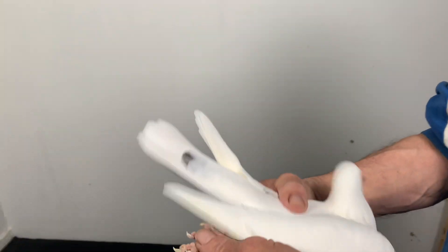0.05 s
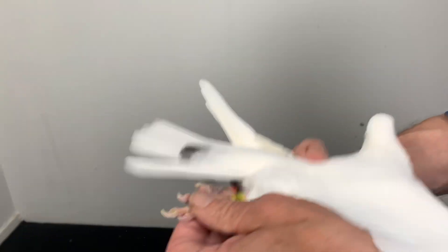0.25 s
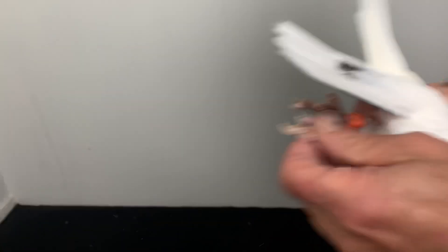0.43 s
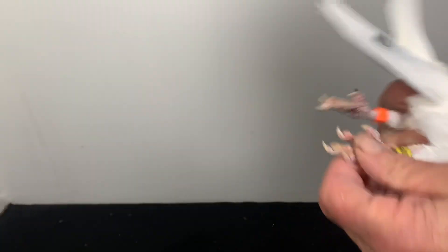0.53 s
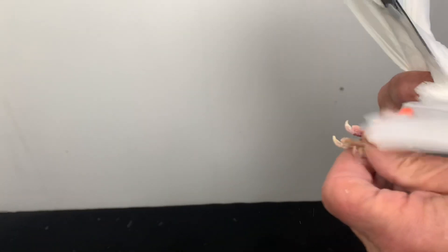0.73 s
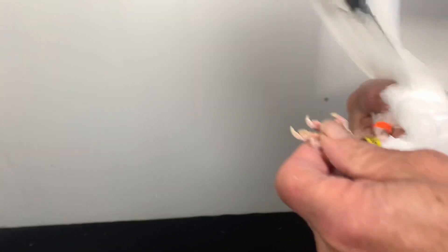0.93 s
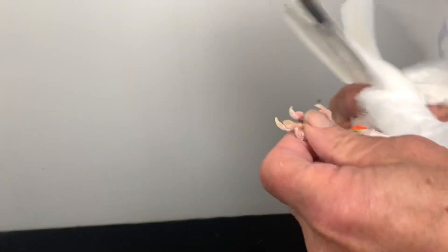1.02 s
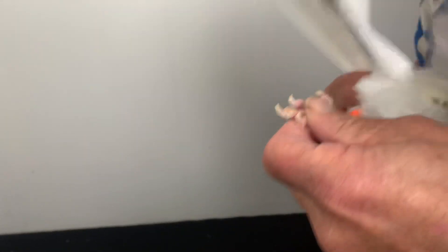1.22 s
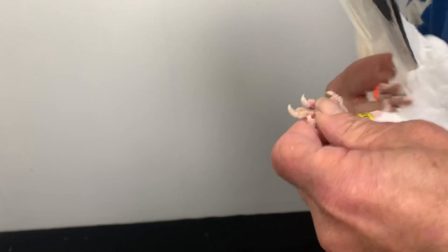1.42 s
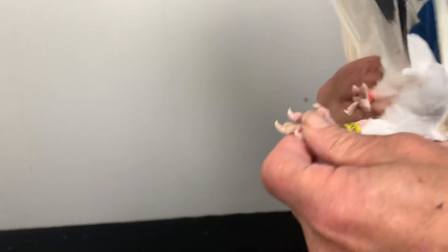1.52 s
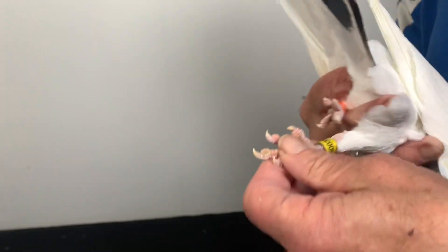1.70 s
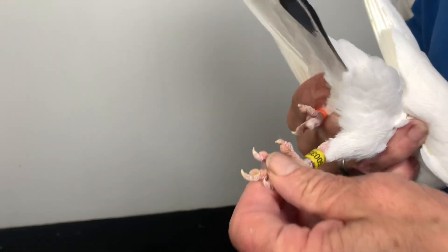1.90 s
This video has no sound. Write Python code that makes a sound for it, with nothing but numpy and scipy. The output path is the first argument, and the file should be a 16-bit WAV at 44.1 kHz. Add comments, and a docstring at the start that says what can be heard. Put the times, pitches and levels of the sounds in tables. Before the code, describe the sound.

A pigeon flaps its wings in short bursts, with rustling feathers, close up indoors.

```python
"""A pigeon held in the hands struggles close to a phone in a small bare room.
First its feathers slide over each other and over the fingers. At 0.2 s the wings clap and throw a puff
of air at the microphone, a thump that falls in pitch. Weak beats follow, then a second, louder clap
and puff at 1.1 s. Last, quills snap and the rustle fades. The walls answer each stroke briefly."""
import sys
import numpy as np
from scipy import signal
from scipy.fft import rfft, irfft, next_fast_len
from scipy.io import wavfile
from scipy.ndimage import uniform_filter1d, map_coordinates

SR = 44100
rng = np.random.default_rng(int(sys.argv[2]) if len(sys.argv) > 2 else 0)


def waveform_to_disk(signal):
    """Save audio, clipped to [-1, 1], as 16-bit WAV at the path in sys.argv[1]."""
    frames = np.transpose(np.atleast_2d(signal))
    scaled = np.clip(frames, -1, 1) * 32767
    samples = np.round(scaled).astype(np.int16)
    wavfile.write(sys.argv[1], SR, samples)


N = 85995


def undb(db):
    """Decibels to amplitude ratio."""
    return 10 ** (np.asarray(db) / 20)

def along(points, hz):
    """Interpolation of (Hz, value) rows on a log-frequency axis."""
    freqs, values = np.array(points, float).T
    return np.interp(np.log(np.maximum(hz, 1)), np.log(freqs), values)

def colour(x, spectrum, unit=True):
    """Minimum-phase filter from the folded cepstrum; with unit, white noise keeps its power."""
    size = next_fast_len(2 * N)
    gain = undb(along(spectrum, np.arange(size // 2 + 1) * SR / size))
    if unit:
        gain = gain / np.sqrt(np.mean(gain ** 2))
    cepstrum = irfft(np.log(gain), size)
    cepstrum[1:size // 2] *= 2
    cepstrum[size // 2 + 1:] = 0
    return irfft(rfft(x, size) * np.exp(rfft(cepstrum)), size)[..., :N]

def above(x, hz, order=2):
    """Zero-phase high-pass."""
    return signal.sosfiltfilt(signal.butter(order, hz, "high", fs=SR, output="sos"), x)

def since(start):
    """Seconds since a moment, zero before it."""
    return np.maximum(np.arange(N) / SR - start, 0)

def strike(start, attack, decay):
    """Transient envelope: quick rise to 1, exponential decay."""
    env = (1 - np.exp(-since(start) / attack)) * np.exp(-since(start) / decay)
    return env / env.max()

def swell(peak, rise, fall):
    """Exponential growth and decay joined by a rounded peak."""
    t = np.arange(N) / SR - peak
    return np.exp(.35 - np.hypot(.6, np.where(t < 0, t / rise, t / fall)))

IMPACT_SPREAD, RUSTLE_SPREAD = .45, 0.81  # side-to-mid amplitude ratios
def ports(draw, spread):
    """Partial coherence: two microphone ports share one noise and get another in antiphase."""
    return (draw() + spread * draw() * np.array([[1], [-1]])) / np.hypot(1, spread)

def hiss():
    """White Gaussian noise."""
    return rng.standard_normal(N)

# Each row: frequency in Hz, relative level of the background in dB.
BACKGROUND_SPECTRUM = [(25, -10), (55, -4), (110, -9), (200, -16.5), (400, -20.5), (1000, -33), (2200, -27),
                       (4000, -37), (9000, -36.5), (16000, -43)]
def background(level_db=-67.5):
    """Stationary noise: a faint, low rush throughout."""
    return undb(level_db) * colour(ports(hiss, RUSTLE_SPREAD), BACKGROUND_SPECTRUM)

# Each row: frequency in Hz, relative level of the churned air in dB.
CHURN_SPECTRUM = [(25, -17), (55, 5), (120, -5.5), (250, -5.5), (350, -10), (520, -10.5), (720, -21),
                  (1500, -29.5), (4000, -48.5), (15000, -70)]
# Each row: peak time of a gust in seconds, level in dB, rise and fall in seconds.
GUSTS = [(.01, -49.5, 0.04, 0.076), (0.234, -24.5, 0.005, 0.02), (0.333, -34.5, 0.033, 0.018),
         (0.449, -30, .018, 0.028), (0.536, -36, 0.0058, 0.023), (0.658, -44, .03, 0.068),
         (0.981, -52.5, 0.026, 0.022), (1.087, -28, 0.0078, 0.027), (1.159, -43.5, 0.046, 0.013),
         (1.279, -39.5, 0.036, 0.021), (1.358, -54.5, .02, 0.033)]
def churned_air():
    """Turbulence around the moving wings makes a low flutter."""
    env = sum(undb(db) * swell(peak, rise, fall) for peak, db, rise, fall in GUSTS)
    return colour(hiss(), CHURN_SPECTRUM) * env

def barbs(clicks_per_s=6000, spread_db=3.0):
    """Stick-slip friction: feather barbs catch and let go in dense, tiny clicks."""
    clicks = (rng.random(N) < clicks_per_s / SR) * rng.choice([-1, 1], N)
    clicks = clicks * undb(spread_db * np.minimum(rng.exponential(size=N), 5))
    return clicks / clicks.std()

# Three friction spectra. Each row: frequency in Hz, relative level in dB.
SIZZLE_SPECTRUM = [(500, -27), (3000, -29.5), (6000, -9), (9000, 5.5), (15000, -2)]
BRUSH_SPECTRUM = [(150, -8), (500, -1.5), (1200, -3), (2500, -3.5), (5000, -16), (9000, -7), (15000, -27.5)]
RASP_SPECTRUM = [(1500, -36), (3500, -16.5), (4600, -3), (6000, -4.5), (8000, -17.5), (15000, -24)]
# Each row: peak time of a slide in seconds, level in dB, rise and fall in seconds,
# brush and rasp in dB relative to the sizzle.
SLIDES = [(0.014, -70, 0.09, 0.034, 14, -28), (0.09, -56.5, 0.018, 0.015, 0, -6.5),
          (0.144, -58, 0.025, 0.016, 1, -18), (0.228, -33.5, 0.0041, 0.013, 5, -29),
          (0.276, -41.5, 0.042, 0.018, -4, -9), (0.402, -29.5, .003, 0.0043, -28, -34.5),
          (0.408, -29, .004, 0.0035, -13, -25), (0.384, -46, 0.027, 0.034, -5.5, -10.5),
          (0.47, -41, .010, 0.039, -8.5, -6), (0.531, -37.5, .004, .018, -6.5, -4.5),
          (.567, -29.5, .012, 0.0053, -19.5, -21.5), (0.654, -54, 0.031, 0.013, 5.5, -7.5),
          (0.738, -59.5, 0.077, 0.044, 5, -3.5), (0.863, -63.5, 0.015, 0.026, 6.5, 7.5),
          (0.968, -42, .020, 0.004, -6.5, -8.5), (1.068, -48, 0.047, 0.018, -9, -9),
          (1.112, -33.5, 0.037, 0.0084, -7.5, -9), (1.247, -32, 0.0073, .0025, -15, -20.5),
          (1.276, -37, 0.0062, .005, -7.5, -6.5), (1.365, -54, 0.015, 0.032, -7, -5.5)]
def sliding_feathers():
    """Friction noise, adding in power: barbs sizzle, vanes brush and ribbed flight feathers rasp."""
    powers = sum(np.outer(undb([0, brush_db, rasp_db]), undb(db) * swell(peak, rise, fall)) ** 2
                 for peak, db, rise, fall, brush_db, rasp_db in SLIDES)
    return sum(colour(np.sqrt(power) * ports(barbs, RUSTLE_SPREAD), spectrum)
               for power, spectrum in zip(powers, (SIZZLE_SPECTRUM, BRUSH_SPECTRUM, RASP_SPECTRUM)))

# Each row: frequency in Hz, relative level of a snap in dB.
SNAP_SPECTRUM = [(300, -27), (1200, -16), (3000, -3), (6000, -4.5), (9200, 10), (15000, -4)]
# Each row: start of a snap in seconds, level in dB.
QUILL_SNAPS = [(.1190, -38), (0.1243, -39.5), (.2238, -18), (0.4713, -31), (0.5258, -24), (.6448, -29),
               (.6586, -36), (0.8121, -39), (1.0852, -10.5), (1.2449, -31.5), (1.2451, -31), (1.2600, -22),
               (1.263, -13.5), (1.2635, -13.5), (1.3686, -40.5), (1.3947, -35)]
def quill_snaps():
    """Impulsive excitation: single quills flick past each other with a bright click."""
    env = sum(undb(db) * strike(start, attack=0.00004, decay=0.00044) for start, db in QUILL_SNAPS)
    return colour(env * ports(hiss, IMPACT_SPREAD), SNAP_SPECTRUM)

# Each row: frequency in Hz, relative level of a clap in dB.
CLAP_SPECTRUM = [(100, -19.5), (250, 5.5), (420, -4), (700, -9), (1000, 8), (1300, 3.5), (1800, 1),
                 (2400, 0.5), (3300, -12.5), (5500, -9), (9000, -6.5), (15000, -15.5)]
# Each row: start of a slap in seconds, level in dB, decay in seconds, treble and bass gains in dB.
WING_SLAPS = [(0.2232, -23, 0.0015, 0, -3.5), (0.229, -27, 0.0031, -1, 6.5),
              (.5252, -29.5, 0.0012, 10.5, -0.5), (0.6451, -35, 0.0024, -5, -10),
              (1.0793, -14.5, 0.0015, 3.5, 1), (1.083, -18.5, 0.0046, 4.5, -2),
              (1.2394, -37.5, 0.0037, 2, -5), (1.2617, -25, 0.0013, 6.5, 3.5)]
def wing_claps(treble_hz=4890, bass_hz=830):
    """Impact noise: stiff flight feathers slap together in a crack of a few milliseconds."""
    crack = colour(ports(hiss, IMPACT_SPREAD), CLAP_SPECTRUM)
    treble, bass = above(crack, treble_hz), crack - above(crack, bass_hz)
    out = 0
    for start, db, decay, treble_db, bass_db in WING_SLAPS:
        shelved = crack + (undb(treble_db) - 1) * treble + (undb(bass_db) - 1) * bass
        out += undb(db) * strike(start, attack=0.00026, decay=decay) * shelved
    return out

# Each row: start of a puff in seconds, level in dB, first and last pitch in Hz,
# glide time constant and rise in seconds, exponent that sharpens the swell.
AIR_PUFFS = [(.2305, -9, 275.5, 57.8, 0.011, 0.011, 1.16), (.4150, -19.5, 225, 98, 0.0061, 0.0057, 1.8),
             (.4310, -31, 130, 68.8, 0.006, 0.014, 1.3), (0.458, -30, 190.9, 67.5, .012, 0.012, 2.8),
             (0.53, -29.5, 240, 60.16, 0.011, .023, 2.5), (1.0846, -6.5, 420, 75, 0.0045, 0.016, 8.1),
             (1.2820, -42.5, 131.5, 58.2, 0.0072, 0.011, 0.95)]
def air_puffs(wobble_depth=0.11, wobble_hz=190):
    """Near-field pressure: an eddy washes over the microphone, its swings slowing as it spreads."""
    jitter = uniform_filter1d(hiss(), int(SR / wobble_hz))
    wobble = 1 + wobble_depth * jitter / jitter.std()
    out = 0
    for start, db, first_hz, last_hz, glide, rise, sharpness in AIR_PUFFS:
        t = since(start)
        hz = (last_hz + (first_hz - last_hz) * np.exp(-t / glide)) * wobble * (t > 0)
        env = (t / rise * np.exp(1 - t / rise)) ** sharpness
        out -= undb(db) * env * np.sin(2 * np.pi * np.cumsum(hz) / SR)
    return out

# Each row: start of a pop in seconds, level in dB, pitch in Hz.
POCKET_POPS = [(0.2307, -17, 490), (0.44, -30.5, 480), (0.4544, -29, 410.3), (1.086, -13, 371.4)]
def air_pockets():
    """Cavity resonance: air squeezed from between the closing wings gives a short, hollow pop."""
    return sum(undb(db) * strike(start, attack=0.0014, decay=0.002)
               * np.sin(2 * np.pi * hz * since(start)) for start, db, hz in POCKET_POPS)

# Each row: frequency of a shaft mode in Hz, relative level in dB.
SHAFT_RESONANCES = [(1300, -1.5), (1600, -4.5), (2100, -5.5), (2950, -2.5), (3450, -14.5)]
# Each row: start of a knock in seconds, level in dB.
SHAFT_KNOCKS = [(0.6429, -41), (1.0797, -20), (1.2626, -19.5)]
def shaft_knocks(decay_s=.0009):
    """Damped modes of alternating sign: hollow feather shafts collide and ring briefly."""
    out = 0
    for start, db in SHAFT_KNOCKS:
        t = since(start)
        for k, (hz, mode_db) in enumerate(SHAFT_RESONANCES):
            out += (-1) ** k * undb(db + mode_db) * np.exp(-t / decay_s) * np.sin(2 * np.pi * hz * t)
    return out

# Each row: band centre in Hz, time to decay by 60 dB in seconds.
REVERB_TIMES = [(70, .5), (250, 0.74), (1000, 0.53), (4000, 0.38), (9000, 0.4054), (15000, 0.23)]
# Each row: frequency in Hz, gain of the reverberation in dB.
REVERB_GAINS = [(60, -4), (300, -12), (480, -16.5), (700, -2), (1100, -12), (4000, -4.5), (9000, -15),
                (15000, -12.5)]
def reverberation(x, gap_s=0.0013, build_s=0.0017):
    """Diffuse reflection from bare walls, dying sooner in the treble."""
    t, hz = since(gap_s), np.arange(N // 2 + 1) * SR / N
    noise, response = rfft(rng.standard_normal((2, N))), 0
    for band_hz, t60 in REVERB_TIMES:
        weight = along([(f, f == band_hz) for f, _ in REVERB_TIMES], hz)
        env = (1 - np.exp(-t / build_s)) * np.exp(-np.log(1000) * t / t60)
        response += irfft(noise * weight, N) * env / np.linalg.norm(env)
    return signal.fftconvolve(x, colour(response, REVERB_GAINS, unit=False), axes=1)[:, :N]

# Each row: frequency of a room mode in Hz, time to decay by 60 dB in seconds, relative gain in dB.
STANDING_WAVES = [(77.14, 0.31, -29), (242.9, 1, -19.5), (514, 0.61, -14)]
def standing_waves(x):
    """Resonance: low modes of the room ring on after each stroke."""
    t, response = since(0), 0
    for hz, t60, db in STANDING_WAVES:
        damping = np.log(1000) / t60
        gain = undb(db) * 2 * np.pi * damping / SR
        response += gain * np.exp(-damping * t) * np.sin(2 * np.pi * hz * t)
    return signal.fftconvolve(x.mean(axis=0), response)[:N]

def scene(left_lag_s=.000217, puff_reverb_db=-11.5):
    """Superposition of bird, room and background; a lag on the left sets the bird slightly right."""
    wings = wing_claps() + air_pockets() + quill_snaps() + sliding_feathers() + churned_air()
    shafts, puffs, floor = shaft_knocks(), air_puffs(), background()
    left = map_coordinates(wings[0], [np.arange(N) - left_lag_s * SR], order=3)
    echo = reverberation(wings + shafts + undb(puff_reverb_db) * puffs)
    boom = standing_waves(wings + puffs)
    return np.array([left, wings[1]]) + shafts + puffs + echo + boom + floor

# Each row: frequency in Hz, gain of the microphone in dB.
MIC_RESPONSE = [(20, -7), (35, 7.5), (55, 0.5), (6400, 0), (7200, -4.5), (8200, 1), (9300, 1), (10800, 1),
                (11700, -12), (12600, 6), (15000, 5.5), (16200, -14.5)]
def record(dry, mono_below_hz=480, rumble_hz=34.7, top_hz=16300):
    """Frequency response: the phone makes the bass mono, colours the sound and limits its band."""
    mid = (dry[0] + dry[1]) / 2
    side = above((dry[0] - dry[1]) / 2, mono_below_hz, order=3)
    stereo = above(np.array([mid + side, mid - side]), rumble_hz)
    coloured = colour(stereo, MIC_RESPONSE, unit=False)
    return signal.sosfilt(signal.ellip(8, .2, 80, top_hz, fs=SR, output="sos"), coloured)


dry = scene()
out = record(dry)
waveform_to_disk(out)
```